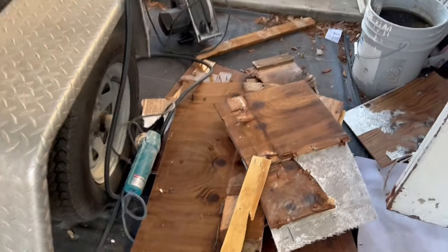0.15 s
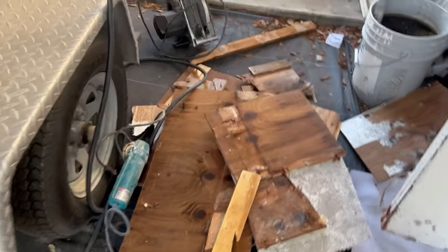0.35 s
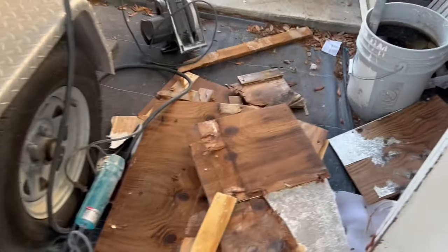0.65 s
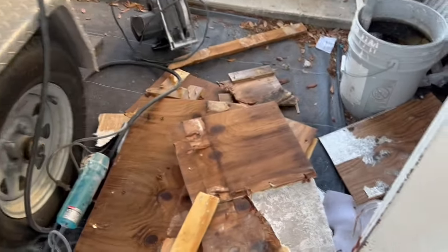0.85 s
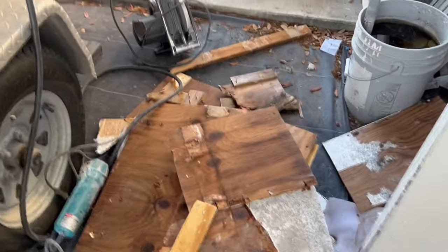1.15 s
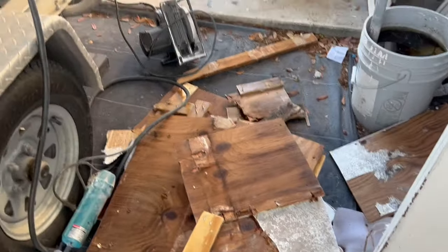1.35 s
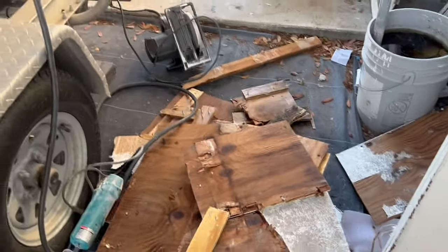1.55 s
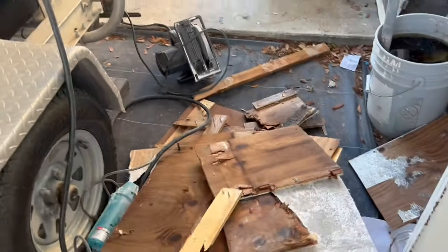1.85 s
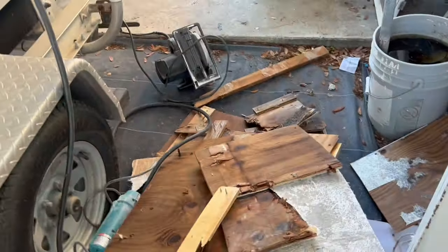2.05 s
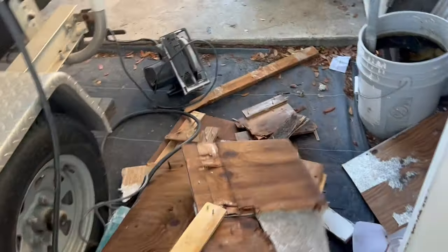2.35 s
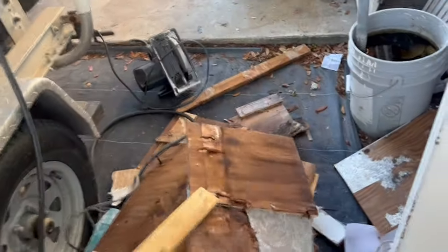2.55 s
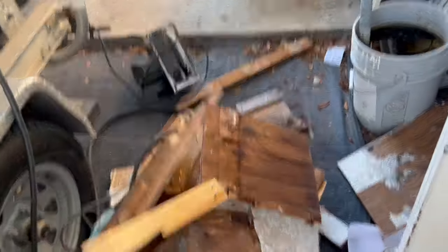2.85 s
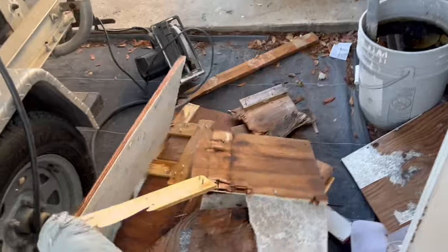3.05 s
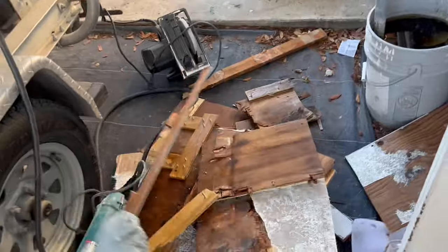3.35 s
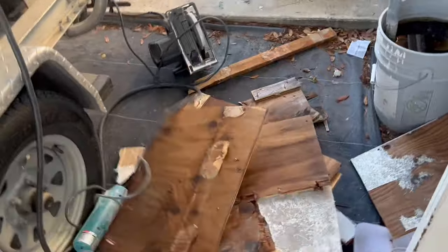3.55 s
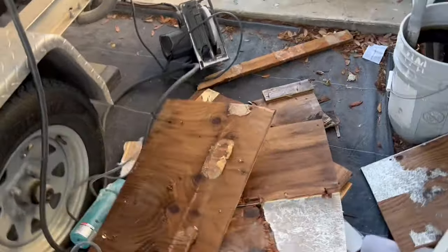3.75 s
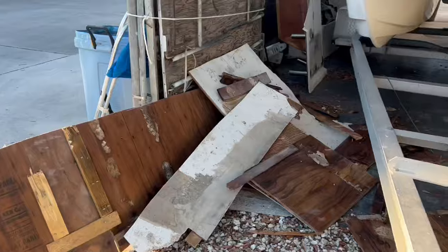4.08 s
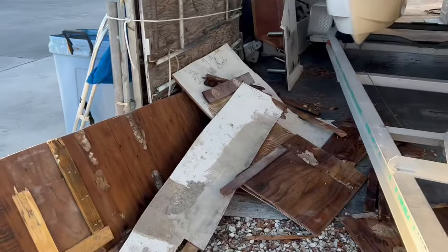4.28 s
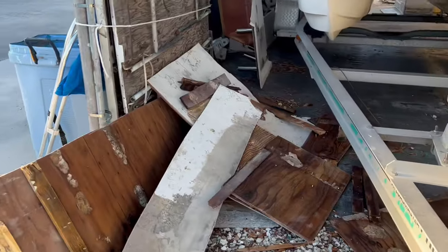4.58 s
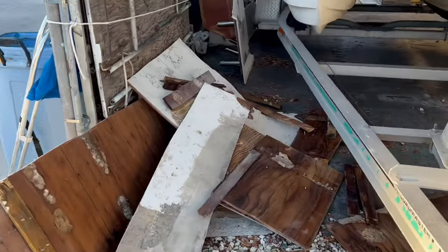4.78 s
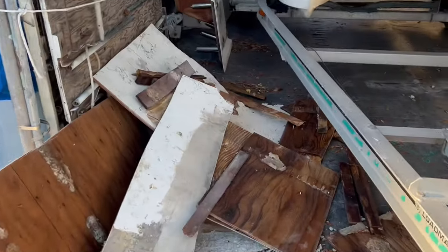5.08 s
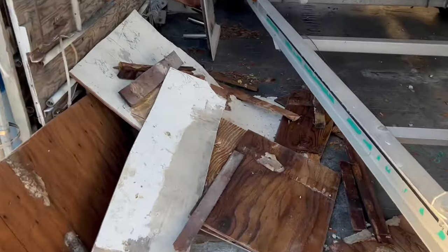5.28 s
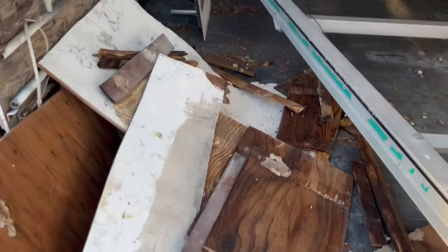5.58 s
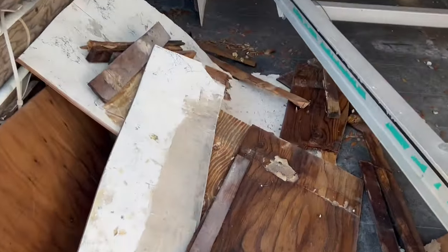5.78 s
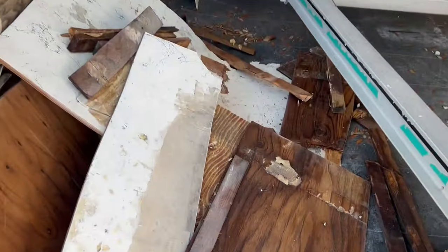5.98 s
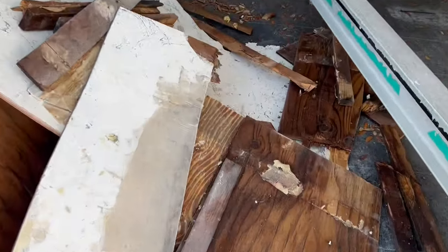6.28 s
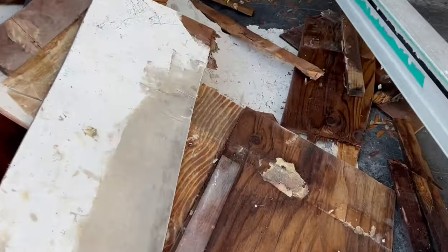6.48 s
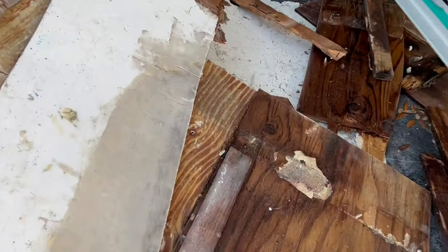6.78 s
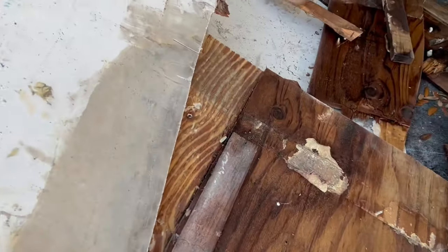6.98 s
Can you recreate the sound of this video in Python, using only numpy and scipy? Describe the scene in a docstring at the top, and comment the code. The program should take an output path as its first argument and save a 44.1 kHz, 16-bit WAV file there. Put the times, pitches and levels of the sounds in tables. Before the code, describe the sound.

A large fan hums while scrap boards are dragged and dropped with hollow knocks, then faint scuffs and a distant idling engine.

```python
"""A large fan blows and hums in a yard, with a faint whine above it. Feet scuff on grit, and from 1.5 s
scrap boards are lifted, dragged and dropped: each blow cracks and sets the pile ringing, an edge rasps,
splinters squeak, and the recorder's gain control ducks everything after the loud hits. At 4.1 s the
sound dips and goes on at another spot, without the hum: a far engine idles and draws nearer, feet
shuffle on grit, and wood knocks once more near the end."""
import sys
import numpy as np
from scipy import signal
from scipy.fft import rfft, irfft, next_fast_len
from scipy.io import wavfile
from scipy.ndimage import uniform_filter1d

SR = 44100
rng = np.random.default_rng(int(sys.argv[2]) if len(sys.argv) > 2 else 0)


def materialize(psi):
    """Save the field psi as 16-bit PCM at rate SR to the path in sys.argv[1].

    A 1-D psi becomes a single channel; in a 2-D psi each row is a channel.
    """
    bounded = np.clip(np.atleast_2d(psi).T, -1, 1)
    quanta = np.round(bounded * 32767).astype(np.int16)
    wavfile.write(sys.argv[1], SR, quanta)


N = 314412

# Tone colour of the fan's rush: frequency_hz, relative_db
FAN_SPECTRUM = [(20, -52), (36, -10), (55, 0.5), (250, -2), (700, -7), (1300, -10.5), (2100, -18),
                (4500, -25), (8000, -34), (15000, -39.5), (16500, -78)]
# Resonances of the fan housing: pitch_hz, nominal_width_hz, level_db
HOUSING_MODES = [(215, 34, -44), (455.5, 15, -44)]
# Path of the faint whine: time_s, pitch_hz, level_db
WHINE_CURVE = [(0, 1773, -48.5), (1.1, 1731, -54), (4.1, 1796, -61), (5.2, 1796, -51), (5.6, 1713, -52.5),
               (7.13, 1774, -57.5)]
# Feet and boards scuffing over grit: start_s, length_s, level_db, peak_position (share of the length)
GRIT_SCUFFS = [(0.896, 0.34, -50.5, 1), (1.53, 0.19, -43.5, 0.087), (1.757, 0.27, -44.5, 0.83),
               (2.197, 0.24, -37, 0.68), (2.416, 0.11, -42, .8), (2.625, 0.56, -40, 1),
               (3.49, .15, -33, .4), (4.083, 0.14, -52.5, 0.13), (4.682, 0.14, -42.5, 0.72),
               (5.215, 0.12, -41.5, .55), (5.358, 0.081, -37.5, 0.45), (5.788, 0.24, -45.5, 0.48),
               (5.992, 0.16, -44, 0.14), (6.456, 0.14, -45.5, .6), (6.589, 0.1, -34.5, 0.13),
               (6.718, 0.036, -33.5, .2), (6.785, 0.33, -50, 0.22)]
# Tone colour of crunching and splintering: frequency_hz, relative_db
CRUNCH_SPECTRUM = [(700, 3.5), (3500, -1.5), (7000, -4), (14800, -8.5), (16500, -23)]
# Boards being slid and turned over: time_s, level_db, pitch_hz
SLIDE_CURVE = [(1.5, -66, 314), (1.75, -48.5, 323), (2.2, -41, 331.3), (2.6, -27.5, 327),
               (2.72, -34, 352.4), (2.77, -27.5, 413.7), (2.88, -29, 432), (2.96, -27.5, 307),
               (3.45, -24.5, 330.7), (3.7, -35, 286.6), (4.08, -45.5, 270.6)]
# Blows on wood: start_s, level_db, pitch_hz, crack_db (relative to the blow), crack_pitch_hz
BOARD_BLOWS = [(1.6095, -18.5, 553, -18.5, 4600), (1.6123, -14.5, 334, -56, 3330),
               (1.679, -26, 326, -54, 1800), (2.25, -16.5, 450, -34, 2500), (2.291, -14.5, 318, -18, 4950),
               (2.309, -2, 568, -24.5, 1900), (2.321, 2, 309, -23.5, 5100), (2.345, 2, 419, -31.5, 1680),
               (2.36, -0.5, 637, -25, 3000), (2.548, -15, 565, -23, 2132), (2.655, -16, 473, -43.5, 1970),
               (2.668, -13, 334, -46.5, 1920), (2.792, -17, 413, -20, 2100), (2.865, -14.5, 390, -20, 2800),
               (2.906, -1.5, 659, -29, 5300), (2.917, -9.5, 331, -26, 2100), (2.95, -13.5, 416, -18, 1950),
               (2.967, -17, 310, -49, 1900), (2.991, -10, 1010, -14.5, 3546),
               (3.013, -7.5, 317, -19.5, 3330), (3.053, -12.5, 626, -24, 1700),
               (3.085, -28.5, 420, 0.5, 4240), (3.157, -8, 852, -19.5, 2980), (3.161, -16, 136, -45, 2000),
               (3.168, -12, 328, -14.5, 8400), (3.198, -9.5, 735, -21, 2150),
               (3.222, -13, 563, -19.5, 2160), (3.247, 2.5, 444, -33, 1910), (3.262, -4, 323, -25.5, 1930),
               (3.277, -11, 318, -36, 1700), (3.401, -23.5, 330, -3, 1970), (3.446, -18, 433, -17.5, 2240),
               (3.496, -10, 750, -29, 2000), (3.503, 1, 780, -18.5, 4830), (3.507, -3, 291, -48, 1800),
               (3.519, -3, 324, -21, 4180), (3.541, -5, 740, -10, 3230), (3.563, 0, 282, -33, 1700),
               (3.583, -19.5, 290, -2.5, 4000), (3.623, -33, 277, -46, 1760), (3.663, -28, 276, -37, 1793),
               (3.705, -17.5, 640, -26.5, 2060), (3.763, -7.5, 990, -19.5, 2170),
               (3.825, -21.5, 430, -38, 2330), (3.87, -17.5, 280, -29, 1926),
               (4.051, -19.5, 616, -25, 1770), (6.66, -15.5, 906, -32.5, 2580),
               (6.685, -25, 825, -44, 1800)]
# Resonances of the wood pile: pitch_hz, gain_db, t60_s
PILE_MODES = [(142, -2, 0.077), (214.4, 1, 0.032), (273, 0, 0.11), (323.4, 0.5, 0.085), (423, 8, 0.046),
              (513.4, -2, 0.086), (576, 3, 0.078), (662, 4.5, 0.054), (738, -0.5, 0.11), (842, -2, 0.11),
              (1025.5, 2.5, 0.053), (1244, -1, 0.042), (1624, 0.5, 0.022), (1920, 7, 0.0083)]
# Single chips snapping: start_s, level_db, pitch_hz
CHIP_SNAPS = [(1.549, -27, 2840), (1.795, -31, 12000), (2.018, -38, 7050), (2.533, -28, 6950),
              (3.354, -23, 2100), (5.5356, -44, 7963), (5.6392, -34.5, 8200), (5.886, -45, 7500),
              (5.958, -34, 7600), (6.072, -32, 7300), (6.087, -35, 8600), (6.173, -39, 8300),
              (6.196, -39, 11960), (6.358, -34.5, 6660), (6.367, -36, 7600), (6.607, -24, 4330),
              (6.705, -41, 3700), (6.771, -31, 6130), (6.824, -36, 8340), (6.987, -34, 7300)]
# An edge rasping along a board: time_s, pitch_hz, level_db
RASP_CURVE = [(2.61, 1880, -54), (2.64, 1900, -36), (2.78, 2010, -41), (3.15, 1890, -43),
              (3.21, 1996, -26.5), (3.32, 1810, -44)]
# Tone colour of the distant wash at the second spot: frequency_hz, relative_db
YARD_SPECTRUM = [(20, -47), (36, 0), (55, -3), (75, 5.5), (150, 3.5), (210, -2), (290, -6), (400, -1),
                 (1000, -6.5), (2200, -18), (4500, -30), (8000, -32.5), (15000, -41), (16500, -65)]
# The far engine drawing nearer: time_s, level_db
ENGINE_CURVE = [(4.1, -65), (6.3, -42.5), (7.13, -42)]
# Swells of a thin, steady-pitched drone: time_s, level_db
DRONE_CURVE = [(4.1, -48), (5.2, -54), (5.5, -43.5), (5.9, -44.5), (6.4, -53), (7.1, -45.5)]
# Stereo width, diffuse against direct sound: frequency_hz, gain_db
DIFFUSE_SPECTRUM = [(60, -24.5), (200, -14.5), (800, -4), (1500, -0.5), (2400, -9), (4500, -2.5),
                    (7000, -7), (16000, -25.5)]
# Left-right phase shift that makes the treble swing between centred and wide: frequency_hz, left_lead_rad
CHANNEL_PHASE = [(0, 0), (2000, .2), (4500, .6), (6500, .1), (7700, -.2), (9200, -2.9), (10700, -3.4),
                 (12200, -5.9), (13500, -6.6), (15000, -9.2)]

FAN_DB, HUM_DB, HUM_HZ = -36, -36.5, 120
SCUFF_RISE_S, SCUFF_FALL_S, SCUFF_LUMPS_DB = 0.018, 0.04, 1.5
GRIT_REST_DB, GRIT_UNDER_BOARDS_DB = -62, -17.5   # between scuffs; relative to the slide
NOTE_DB, NOTE_T60_CYCLES, NOTE_RISE_CYCLES = 1.5, 26, 0.4   # level relative to the blow
NOTE_SHARP, NOTE_SETTLE_CYCLES = 0.25, 0.8   # a struck board starts sharp by this share
GROAN_DB, GROAN_WAVER_HZ = 1.5, 15   # level relative to the slide
RATTLE_DB, RATTLE_T60_S = -14, 0.25   # level relative to the blow
SQUEAK_TIMES_S, SQUEAK_HZ, SQUEAK_DB = (3.03, 3.09), 12900, -26.5
MOVE_S, DIP_S = 4.087, 0.035   # the cut to the second spot
YARD_DB, DRONE_HZ = -36.5, 638
ENGINE_HZ, ENGINE_PARTIALS = 53.6, [(1, 2), (2, -1), (4, -9.5)]   # partials: harmonic, gain_db
DUCK_ABOVE_DB, DUCK_ATTACK_S, RECOVERY_DB_PER_S, CUTOFF_HZ = -18, 0.06, 45, 16450


def amp(db):
    """dB to gain."""
    return 10 ** (np.asarray(db) / 20)


def rms_one(x):
    """Scaled to unit rms."""
    return x / np.sqrt(np.mean(x ** 2) + 1e-20)


def in_time(rows):
    """Columns of a curve table, one value per sample."""
    times, *columns = np.transpose(rows)
    return [np.interp(np.arange(N) / SR, times, column) for column in columns]


def colour(x, points):
    """EQ drawn through (frequency_hz, gain_db) points."""
    size = next_fast_len(N)
    hz, db = np.transpose(points)
    gain = amp(np.interp(np.log(np.fft.rfftfreq(size, 1 / SR) + 1), np.log(hz), db))
    return irfft(rfft(x, size) * gain, size)[..., :N]


def filtered(x, hz, kind="low"):
    """Gentle low-, high- or band-pass."""
    return signal.sosfilt(signal.butter(2, hz, kind, fs=SR, output="sos"), x)


def tone(hz):
    """A sine of rms 1 that follows a pitch curve."""
    return np.sqrt(2) * np.sin(2 * np.pi * np.cumsum(hz) / SR)


def drift(per_s):
    """Smooth random wander, roughly within plus or minus 1."""
    knots = np.arange(0, N / SR + 1, 1 / per_s)
    return np.interp(np.arange(N) / SR, knots, rng.standard_normal(400)[:len(knots)])


def ring(x, hz, t60):
    """Resonator: a unit click sets a sine of height 1 ringing."""
    radius, angle = amp(-60 / (t60 * SR)), 2 * np.pi * hz / SR
    return signal.lfilter([0, np.sin(angle)], [1, -2 * radius * np.cos(angle), radius ** 2], x + 1e-18)


def grains(per_s, spread_db):
    """Random clicks, most small, a few large; rms 1."""
    sizes = amp(spread_db * np.minimum(rng.exponential(1, N), 5)) * rng.choice([-1, 1], N)
    return rms_one(sizes * (rng.random(N) < per_s / SR))


def bursts(times, peak_db, t60, smooth=90):
    """Envelope of decaying hits, softened over `smooth` samples."""
    starts = np.zeros(N)
    np.add.at(starts, (np.asarray(times) * SR).astype(int), amp(peak_db))
    decays = signal.lfilter([1], [1, -amp(-60 / (t60 * SR))], starts + 1e-18)
    return uniform_filter1d(decays, size=smooth)


def off_pitch_db(hz, pitch_hz, slope_db, most_db):
    """A piece rings best near its own pitch: loss per octave away from it, up to a limit."""
    return -np.minimum(slope_db * np.abs(np.log2(hz / pitch_hz)), most_db)


def air(spectrum, level_db):
    """Bed of turbulent air: its direct and diffuse parts are unrelated noise."""
    return amp(level_db + 0.58 * drift(7.5)) * rms_one(colour(rng.standard_normal((2, N)), spectrum))


def fan():
    """Rushing air, noise ringing in the housing, and motor hum at twice the mains rate."""
    housing = sum(amp(db) * rms_one(ring(rng.standard_normal((2, N)), hz, t60=1.35 / width))
                  for hz, width, db in HOUSING_MODES)
    hum = np.sqrt(2) * amp(HUM_DB + 1.2 * drift(6)) * np.sin(2 * np.pi * HUM_HZ * np.arange(N) / SR)
    return air(FAN_SPECTRUM, FAN_DB) + housing + hum


def whine():
    """A narrow band of noise riding on a gliding pitch."""
    hz, db = in_time(WHINE_CURVE)
    waver = rms_one(filtered(rng.standard_normal((2, N)), 40))
    return amp(db) * waver * tone(hz)


def scuffing():
    """Envelope of the grit: each scuff swells and fades unevenly; sliding boards grind it too."""
    t = np.arange(N) / SR
    scuffs = np.zeros(N)
    for start, length, db, peak_position in GRIT_SCUFFS:
        corners_s = [-SCUFF_RISE_S, 0, np.clip(peak_position, .05, .95) * length,
                     length, length + SCUFF_FALL_S]
        scuffs += amp(db) * np.interp(t - start, corners_s, [0, .65, 1, .65, 0]) ** 2
    slide, _ = sliding()
    lumps = amp(SCUFF_LUMPS_DB * drift(25))
    return amp(GRIT_REST_DB) + lumps * (scuffs + amp(GRIT_UNDER_BOARDS_DB) * slide)


def grit():
    """Dense crunch under each scuff, with stray chips snapping at random within it."""
    level = scuffing()
    crunch = rms_one(colour(grains(1800, 0.76), CRUNCH_SPECTRUM))
    stray_times = np.flatnonzero(rng.random(N) < 60 / SR) / SR
    snaps = bursts(stray_times, 0, t60=.012, smooth=20)
    hiss = filtered(rng.standard_normal(N), [4500, 14000], "band")
    return level * (crunch + hiss * snaps * amp(4 + 4 * drift(30)))


def sliding():
    """Gain and pitch of the sliding boards, silent while they lie still."""
    db, hz = in_time(SLIDE_CURVE)
    t = np.arange(N) / SR
    return amp(db) * (t > SLIDE_CURVE[0][0]) * (t < MOVE_S), hz


def boards():
    """Blows and dragging ring the pile's modes; a sliding board groans, and the pile rattles on."""
    times, level_db, pitch, crack_db, _ = np.transpose(BOARD_BLOWS)
    slide, slide_hz = sliding()
    variation_db = 3 * rng.standard_normal((len(times), len(PILE_MODES)))
    knocks, chatter = np.zeros(N), np.zeros(N)
    for k, (hz, db, t60) in enumerate(PILE_MODES):
        # soft blows hardly reach the high modes; modes below the struck piece hardly move
        dull_db = 0.38 * np.minimum(crack_db + 31, 0)
        dull_db *= np.maximum(np.log2(hz / np.maximum(pitch, 600)), 0)
        below_db = -5.5 * np.maximum(np.log2(pitch / hz), 0)
        mode_db = db + dull_db + below_db + off_pitch_db(hz, pitch, 30, 12) + variation_db[:, k]
        # broad faces meet over some ms, so each contact is a short scrabble of force
        force = bursts(times, level_db + mode_db - 28, t60=0.03) * rng.standard_normal(N)
        knocks += ring(force, hz, t60)
        friction = grains(900, 4.1) * amp(db + off_pitch_db(hz, slide_hz, 28.5, 11.2))
        chatter += ring(friction, hz, t60)
    waver = rms_one(filtered(rng.standard_normal(N), GROAN_WAVER_HZ))
    groan = amp(GROAN_DB) * slide * waver * np.sin(2 * np.pi * np.cumsum(slide_hz) / SR)
    on_pile = times < MOVE_S
    rattle = bursts(times[on_pile], level_db[on_pile] + RATTLE_DB, RATTLE_T60_S)
    wood = knocks + hollow_notes() + groan + (slide + rattle) * rms_one(chatter)
    return filtered(wood, 90, "high")   # small boards radiate no deep bass


def cracks():
    """Single chips tick; each blow splinters with a broad burst, a snap and a longer scrabble."""
    times, blow_db, _, crack_db, pitch = np.transpose(BOARD_BLOWS)
    chip_times, chip_db, chip_hz = np.transpose(CHIP_SNAPS)
    level_db = blow_db + crack_db
    crunch = rms_one(colour(grains(8000, 1.7), CRUNCH_SPECTRUM))
    splinters = crunch * uniform_filter1d(bursts(times, level_db + 1.5, t60=0.089), size=200)
    for hz in np.geomspace(1500, 14000, num=20):
        band = rms_one(ring(ring(crunch, hz, 13 / hz), hz, 13 / hz))
        snap = bursts(times, level_db + 13 + off_pitch_db(hz, pitch, 40, 12), t60=0.02, smooth=24)
        chip_colour_db = off_pitch_db(hz, chip_hz, np.where(hz < chip_hz, 36, 8), 45)
        tick = bursts(chip_times, chip_db + chip_colour_db, t60=0.016, smooth=24)
        scrabble = bursts(times, level_db - 2 + off_pitch_db(hz, pitch, 35, 18), t60=0.13)
        splinters += band * (snap + tick + scrabble * amp(4 * drift(45)))
    return splinters


def hollow_notes():
    """Each struck board sounds its own note, which starts sharp and settles as it dies."""
    t = np.arange(int(.2 * SR)) / SR
    notes = np.zeros(N)
    for start_s, db, hz, _, _ in BOARD_BLOWS:
        cycles = hz * t
        bend = NOTE_SHARP * NOTE_SETTLE_CYCLES * (1 - np.exp(-cycles / NOTE_SETTLE_CYCLES))
        attack = 1 - np.exp(-cycles / NOTE_RISE_CYCLES)
        decay = amp(db + NOTE_DB - 60 * cycles / NOTE_T60_CYCLES)
        start = int(start_s * SR)
        notes[start:start + len(t)] += attack * decay * np.sin(2 * np.pi * (cycles + bend))
    return notes


def rasp():
    """An edge scrapes a board: uneven slips of friction ride on one moving resonance."""
    hz, db = in_time(RASP_CURVE)
    t = np.arange(N) / SR
    slips = rms_one(filtered(grains(900, 2.7), 260))
    scraping = (t > RASP_CURVE[0][0]) * (t < RASP_CURVE[-1][0])
    return amp(db) * slips * tone(hz) * scraping


def squeak():
    """Splinters rub together in two short, very high swells of noise."""
    t = np.arange(N) / SR
    swells = sum(np.exp(-((t - peak_s) / 0.011) ** 2) for peak_s in SQUEAK_TIMES_S)
    rubbing = ring(ring(grains(3700, 3.2), SQUEAK_HZ, 0.00042), SQUEAK_HZ, 0.00041)
    return amp(SQUEAK_DB) * swells * rms_one(rubbing)


def yard():
    """Bed of the second spot: a distant wash, a far engine's wavering partials and a thin drone."""
    idle_hz = ENGINE_HZ * (1 + 0.011 * drift(5.6))
    engine = sum(amp(db + 1.1 * drift(9.6)) * tone(k * idle_hz) for k, db in ENGINE_PARTIALS)
    engine *= amp(in_time(ENGINE_CURVE)[0])
    drone = amp(1.4 * drift(9)) * tone(DRONE_HZ * (1 + 0.0019 * drift(6)))
    drone *= amp(in_time(DRONE_CURVE)[0])
    return air(YARD_SPECTRUM, YARD_DB) + engine + drone


def scatter(x):
    """A close sound and its diffuse partner, a short smear of echoes off nearby surfaces."""
    t = np.arange(int(.06 * SR)) / SR
    echoes = rng.standard_normal(len(t)) * amp(-60 * t / 0.13)
    return np.array([x, signal.oaconvolve(x, echoes / np.linalg.norm(echoes))[:N]])


def scene():
    """Mid/side mix: direct sound in the middle, diffuse at the sides, a dip at the change of spot."""
    t = np.arange(N) / SR
    bed = np.where(t < MOVE_S, fan(), yard()) + whine()
    foley = boards() + cracks() + rasp() + squeak() + grit()
    direct, diffuse = bed + scatter(foley)
    diffuse = colour(diffuse, DIFFUSE_SPECTRUM)
    dip = np.clip(np.abs(t - MOVE_S) / DIP_S, .04, 1)
    fade_out = np.clip((N / SR - t) / 0.0024, 0, 1)
    return np.array([direct + diffuse, direct - diffuse]) * dip * fade_out


def record(dry):
    """Left-right phase shift, bass cut, gain control with a lagging attack, soft clip, top cut."""
    size = next_fast_len(N)
    lead = np.interp(np.fft.rfftfreq(size, 1 / SR), *np.transpose(CHANNEL_PHASE))
    stereo = irfft(rfft(dry, size) * np.exp(.5j * lead * [[1], [-1]]), size)[:, :N]
    stereo = filtered(stereo, 38, "high")
    power = uniform_filter1d(np.mean(stereo ** 2, axis=0), size=1000)
    over_db = np.maximum(10 * np.log10(power + 1e-12) - DUCK_ABOVE_DB, 0)
    recovery_db = RECOVERY_DB_PER_S * np.arange(N) / SR
    held_db = np.maximum.accumulate(over_db + recovery_db) - recovery_db
    lag = np.exp(-1 / (DUCK_ATTACK_S * SR))
    ducked = stereo * amp(-.75 * signal.lfilter([1 - lag], [1, -lag], held_db))
    return signal.sosfilt(signal.cheby2(12, 70, CUTOFF_HZ, fs=SR, output="sos"), np.tanh(ducked))


dry = scene()
out = record(dry)
materialize(out)
```